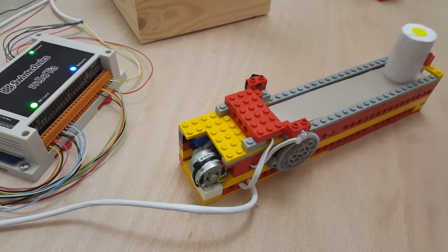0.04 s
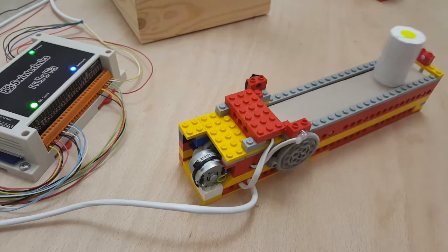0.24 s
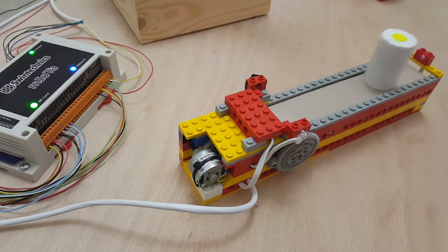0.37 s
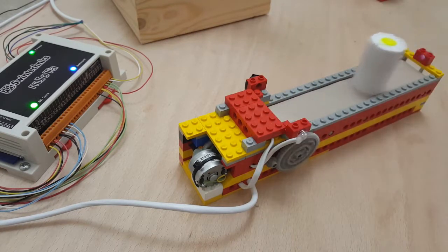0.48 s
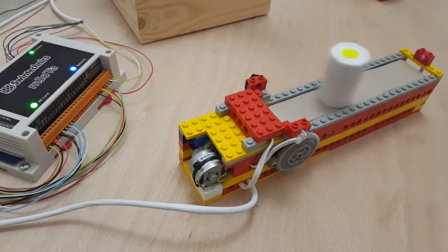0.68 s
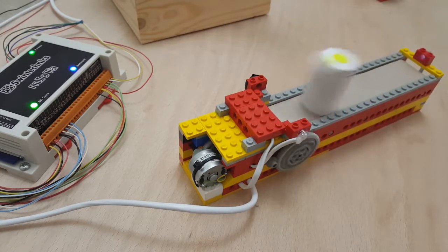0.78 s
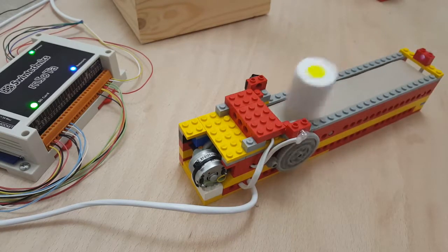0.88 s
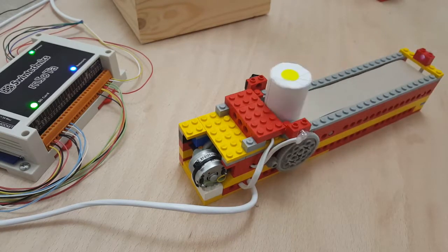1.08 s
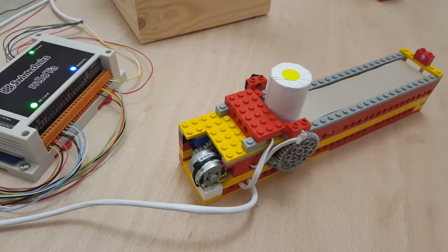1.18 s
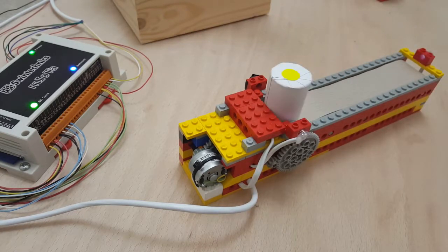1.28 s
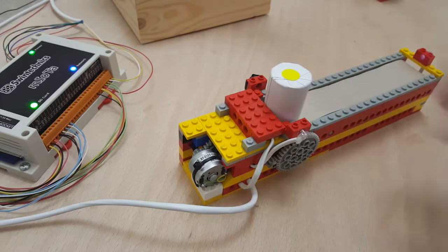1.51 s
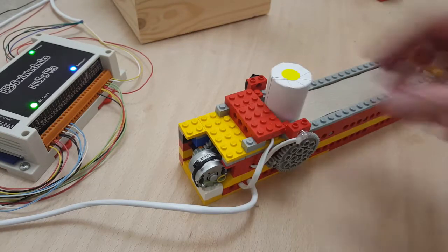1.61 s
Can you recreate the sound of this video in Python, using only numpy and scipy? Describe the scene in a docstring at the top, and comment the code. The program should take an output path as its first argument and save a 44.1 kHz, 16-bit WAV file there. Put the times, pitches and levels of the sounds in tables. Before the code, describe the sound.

Plastic gears grind and chatter as a motorized toy conveyor runs briefly and cuts out.

```python
"""A small DC motor drives a toy conveyor of plastic bricks on a table, close by in a small room.
From the start the motor hums, the gears grind and the table rumbles. As the load grows, teeth catch
and snap free about 19 times a second; each chatter rings the bricks and knocks the hollow base.
Cargo bumps from 0.2 s on; plastic squeaks once at 0.33 s. Near 1.17 s the cargo hits the end stop,
the motor cuts out and the room rings away. A faint rustle follows near 1.5 s."""
import sys
import numpy as np
from scipy import signal
from scipy.fft import rfft, irfft, next_fast_len
from scipy.io import wavfile
from scipy.ndimage import uniform_filter1d

SR = 44100
rng = np.random.default_rng(int(sys.argv[2]) if len(sys.argv) > 2 else 0)


def persist_wave(psi):
    """Save psi, clipped to +-1, as 16-bit WAV."""
    counts = np.round(np.clip(psi, -1, 1) * 32767).astype(np.int16)
    wavfile.write(sys.argv[1], SR, np.atleast_2d(counts).T)


N = 72765
T = np.arange(N) / SR
AGE = T[:SR // 2]  # time since a blow, s

# room air spectrum: freq_hz, gain_db
AIR_SPECTRUM = [(25, 1), (60, 0), (90, 4), (130, 0), (190, 1), (300, -4), (600, -8), (2000, -13),
                (6000, -27), (15000, -33)]
# motor hum partials: speed_multiple, level_db
HUM_PARTIALS = [(1, -58), (2, -62)]
# motor hum under load: time_s, gain_db
HUM_CURVE = [(0, -12), (.1, -7), (.3, -1.5), (.42, 6.5), (.58, -2.5), (.72, 4), (1.0, 1.5), (1.18, 6),
             (1.23, -9), (1.3, -41)]
# gear grinding: time_s, gain_db, treble_db
GRIND_CURVE = [(0, -27.5, -11), (.06, -25, -2), (.11, -18.5, -22), (.21, -14.5, -8.5), (.26, -7.5, -1),
               (.33, -14, -12), (.40, -8, -8), (.47, -9, -11.5), (.51, -1.5, 0.5), (.555, -4.5, -3),
               (.59, -3, 3), (.65, -2, -5.5), (.72, -3.5, 4), (.85, 4.5, -3.5), (.91, -2.5, 0),
               (1.02, -0.5, -4.5), (1.13, -3, 0), (1.17, -13, -4.5), (1.20, -26, -7.5), (1.27, -25, -3),
               (1.30, -56, 15.5)]
# plastic click spectrum: freq_hz, gain_db
CLICK_SPECTRUM = [(100, -20.5), (400, 2.5), (700, 1), (950, -6), (1250, 3), (1650, 1), (1930, 8.5),
                  (2200, 3.5), (2800, 1.5), (4400, 0.5), (5100, -8), (9500, -12.5), (13000, -14),
                  (15500, -28)]
# brick frame modes: freq_hz, t60_s, gain_db
FRAME_MODES = [(1189, 0.11, -2), (1502, 0.13, -8), (1974, 0.03, -5), (2400, .05, -6), (3612, .05, -3.5),
               (4270, 0.02, -10.5), (6395, 0.045, -7)]
# drive rumble into the table: time_s, gain_db
RUMBLE_CURVE = [(0, -16.5), (.08, -4.5), (.19, -6), (.25, -4.5), (.45, -1.5), (.65, 4), (.85, 2.5),
                (1.10, -0.5), (1.17, 7.5), (1.21, -21), (1.29, -39)]
# table and base modes: freq_hz, t60_s, gain_db
TABLE_BASE_MODES = [(92, 0.2, -9.5), (163.5, 0.11, -3), (196.3, 0.1, -3), (275.5, 0.053, -4),
                    (341, 0.05, -2), (381.5, 0.047, -0.5), (414.6, .07, -4.5), (595, 0.011, -13.5)]
# tooth snaps: start_s, chatter_db, length_s, treble_db, base_db, wheel_db, tooth_db
TOOTH_SNAPS = [(0.024, -28.5, 0.01, -6, -68, -70, -78), (0.077, -19.5, 0.0045, -7, -65, -60, -59),
               (0.084, -16.5, .012, -1.5, -53, -53, -63), (0.145, -20.5, 0.01, -4, -63, -66, -72),
               (0.228, -8, 0.011, 1, -36, -43, -48), (0.276, -18.5, 0.008, -14, -62, -58, -68),
               (0.362, -15, 0.0042, -9, -34.5, -58, -69), (0.407, -15.5, 0.021, -4, -46.5, -53, -70),
               (0.485, -6.5, 0.014, -0.5, -47.5, -50.5, -49.5), (0.563, -3.5, 0.011, 0, -44, -44, -38),
               (0.621, -2.5, 0.0052, .5, -45.5, -41, -45), (0.668, 3.5, 0.011, 1.5, -36.5, -29, -35),
               (0.719, 3.5, 0.0097, -0.5, -38.5, -39.5, -44.5),
               (0.734, -0.5, .0065, -4, -36.5, -37.5, -48.5), (0.769, 1.5, 0.0087, 2.5, -39, -32, -40.5),
               (0.817, -0.5, .0065, 2, -42, -27.5, -53.5), (0.865, -4, 0.0068, 3.5, -46.5, -40, -52.5),
               (0.918, -4.5, 0.01, 2.5, -40, -31.5, -54), (0.979, 0, 0.01, 1.5, -40, -47, -41.5),
               (1.038, -2, 0.0078, 1.5, -50, -37, -38.5), (1.087, -3, 0.0041, 2, -44, -42, -51.5),
               (1.139, -2, 0.011, -1, -39, -51, -42), (1.268, -35, 0.0034, -14.5, -61, -57, -78.5)]
# hollow base knock: pitch_hz, swell_s, gain_db
BASE_MODES = [(370.8, 0.0068, -1)]
# gear wheel ring: pitch_hz, swell_s, gain_db
WHEEL_MODES = [(1917, .0035, 0)]
# tooth ping: pitch_hz, swell_s, gain_db
TOOTH_MODES = [(4210, 0.0049, 4.5), (6300, 0.0021, -10)]
# cargo and frame bumps on the table: start_s, gain_db
CARGO_BUMPS = [(.195, -22), (.248, -10.5), (.495, -13), (.525, -18), (.848, 1.5), (1.050, -10),
               (1.153, -8.5), (1.165, -4.5)]
# soft bump spectrum: freq_hz, gain_db
BUMP_SPECTRUM = [(40, -32), (80, -8), (115, -12.5), (170, 2), (350, 1.5), (550, -8), (1200, -10.5),
                 (4000, -61)]
# deep sway of the table top: freq_hz, t60_s, gain_db
SWAY_MODES = [(82.7, .35, 4.5), (99, 0.39, -9)]
# rustle spectrum: freq_hz, gain_db
RUSTLE_SPECTRUM = [(400, -17.5), (950, -10), (1400, -0.5), (2050, -2.5), (2500, -6), (4500, -11),
                   (6000, -14.5), (12000, -16.5), (15500, -24)]
# room decay: freq_hz, t60_s
ROOM_DECAY = [(100, 0.4), (400, 0.35), (2000, 0.21), (5000, 0.23), (14000, .26)]
# room tail spectrum: freq_hz, gain_db
ROOM_SPECTRUM = [(100, -7.5), (400, -5.5), (2000, 1.5), (5000, 2), (14000, -1.5)]
# stereo balance: freq_hz, left_minus_right_db
BALANCE = [(170, -3.5), (380, 0.5), (2400, 0.5), (4400, -3.5), (8000, 4.5), (15000, 3)]

AIR_DB, AIR_LIKENESS, ROOM_HUM_HZ, ROOM_HUM_DB = -72.5, 0.37, 195.7, -79.5
MOTOR_HZ, MOTOR_WOW, HUM_FLUTTER_DB = 187.96, 0.05, 2.5
GRIND_DB, GRIND_FLUTTER_DB, MESH_DEPTH = -37, 2, 0.4
CLICKS_PER_S, CLICK_SPREAD_DB = 4500, 2.5
FRAME_RING_DB, TREBLE_HZ = 2, 4915
RUMBLE_DB, RUMBLE_HIGHPASS_HZ, BUMP_DB = -24.5, 141, 10
SNAP_DB, SNAP_CLICKS_PER_S, SNAP_DETUNE = 1.42, 2600, 0.018
CHATTER_ATTACK_S, CHATTER_RELEASE_S = 0.0041, 0.0013
SQUEAK_AT_S, SQUEAK_HALF_WIDTH_S, SQUEAK_HZ, SQUEAK_JITTER, SQUEAK_DB = 0.328, 0.009, 2010, 0.06, -44
RUSTLE_AT_S, RUSTLE_HALF_WIDTH_S, RUSTLE_DB = 1.485, 0.061, -69
SCATTER_T60_S, SCATTER_DB, SCATTER_HIGHPASS_HZ, RIGHT_LAG_S = 0.032, 5, 874, 0.00012
ROOM_GAP_S, ROOM_LIKENESS, WIDE_ABOVE_HZ = 0.0099, 0.62, 900


def undb(db):
    """Decibels to gain."""
    return 10 ** (np.asarray(db) / 20)


def unit(x):
    """Scale to rms 1."""
    return x / np.sqrt(np.mean(x ** 2))


def curve(table, col=1):
    """Table column, interpolated over time."""
    rows = np.array(table)
    return np.interp(T, rows[:, 0], rows[:, col])


def at_freq(table, f):
    """Table value, interpolated over log frequency."""
    rows = np.array(table)
    return np.interp(np.log(np.maximum(f, 1)), np.log(rows[:, 0]), rows[:, 1])


def shape(x, response):
    """Zero-phase filter with gain response(freq_hz)."""
    size = next_fast_len(x.shape[-1] + SR // 10, real=True)
    freq_hz = np.arange(size // 2 + 1) * SR / size
    return irfft(rfft(x, size) * response(freq_hz), size)[..., :x.shape[-1]]


def highpass(x, hz):
    """Second-order Butterworth high-pass."""
    return signal.sosfilt(signal.butter(2, hz, "high", fs=SR, output="sos"), x)


def through(x, response):
    """Convolve with a mono or stereo impulse response."""
    size = next_fast_len(N + len(AGE), real=True)
    return irfft(rfft(x, size) * rfft(response, size), size)[..., :N]


def tick(spectrum, size=4096):
    """Minimum-phase impulse with the given spectrum."""
    freq_hz = np.arange(size // 2 + 1) * SR / size
    cepstrum = irfft(np.log(undb(at_freq(spectrum, freq_hz))))
    cepstrum[1:size // 2] *= 2
    cepstrum[size // 2 + 1:] = 0
    return np.pad(irfft(np.exp(rfft(cepstrum))), (0, len(AGE) - size))


def ring(modes):
    """Impulse response of damped modes, alternating in sign; gain_db holds at resonance."""
    out = 0
    for k, (hz, t60_s, gain_db) in enumerate(modes):
        decay = np.log(1000) / t60_s
        gain = (-1) ** k * undb(gain_db) * 2 * decay / SR
        out = out + gain * np.exp(-decay * AGE) * np.sin(2 * np.pi * hz * AGE)
    return out


def fade(t60_s, gap_s):
    """Unit-energy decay starting after a gap."""
    decay = np.log(1000) / t60_s
    return (AGE >= gap_s) * np.exp(-decay * np.maximum(AGE - gap_s, 0)) * np.sqrt(2 * decay / SR)


def wander(rate_hz):
    """Smooth random drift, rms 1."""
    hold = int(SR / rate_hz)
    steps = np.repeat(rng.standard_normal(N // hold + 1), hold)
    return unit(uniform_filter1d(steps, hold)[:N])


def clicks(per_s):
    """Dense tiny impacts of uneven size, rms 1."""
    hits = (rng.random(N) < per_s / SR) * rng.choice([-1, 1], N)
    return unit(hits * undb(CLICK_SPREAD_DB * np.clip(rng.standard_normal(N), -2, 2)))


def stereo_noise(likeness):
    """Noise at two microphones: partly alike in the bass, unrelated in the treble."""
    mid, side = rng.standard_normal((2, N))
    coherence = lambda f: likeness / (1 + (f / WIDE_ABOVE_HZ) ** 2)
    mid = shape(mid, lambda f: np.sqrt(1 + coherence(f)))
    side = shape(side, lambda f: np.sqrt(1 - coherence(f)))
    return np.array([mid + side, mid - side]) / np.sqrt(2)


def room_air():
    """Quiet air with a faint steady hum."""
    air = unit(shape(stereo_noise(AIR_LIKENESS), lambda f: undb(at_freq(AIR_SPECTRUM, f))))
    hum = np.sqrt(2) * np.sin(2 * np.pi * ROOM_HUM_HZ * T)
    return undb(AIR_DB) * air + undb(ROOM_HUM_DB) * hum


def motor_hum(turns):
    """Rotor imbalance hums unevenly through the base."""
    load_db = curve(HUM_CURVE)
    return sum(undb(db + load_db + HUM_FLUTTER_DB * wander(45)) * np.sin(2 * np.pi * multiple * turns)
               for multiple, db in HUM_PARTIALS)


def gear_grind(turns):
    """Teeth scrape, swelling once per motor turn. Rows: force, treble change."""
    mesh = 1 + MESH_DEPTH * np.cos(2 * np.pi * turns)
    scrape = clicks(CLICKS_PER_S) * mesh
    force = scrape * undb(GRIND_DB + curve(GRIND_CURVE) + GRIND_FLUTTER_DB * wander(120))
    return np.array([force, force * (undb(curve(GRIND_CURVE, col=2)) - 1)])


def brick_frame(force, treble_change, places=4):
    """Each impact rings the frame at a random place. One signal per place."""
    place = rng.integers(0, places, N)
    response = tick(CLICK_SPECTRUM) + undb(FRAME_RING_DB) * ring(FRAME_MODES)
    parts = []
    for k in range(places):
        treble = shape(treble_change * (place == k), lambda f: f ** 6 / (f ** 6 + TREBLE_HZ ** 6))
        parts.append(through(force * (place == k) + treble, response))
    return parts


def table_rumble():
    """Grinding lightly shakes table and base."""
    shake = clicks(CLICKS_PER_S) * undb(RUMBLE_DB + curve(RUMBLE_CURVE))
    return through(highpass(shake, RUMBLE_HIGHPASS_HZ), ring(TABLE_BASE_MODES))


def snap_chatter():
    """Each slipping tooth chatters briefly. Rows: force, treble change."""
    grain = clicks(SNAP_CLICKS_PER_S)
    out = np.zeros((2, N))
    for start_s, chatter_db, length_s, treble_db, *_ in TOOTH_SNAPS:
        first = int(start_s * SR)
        span = slice(first, first + SR // 20)
        age_s = T[span] - T[first]
        attack = np.minimum(age_s / CHATTER_ATTACK_S, 1)
        release = np.exp(-np.maximum(age_s - length_s, 0) / CHATTER_RELEASE_S)
        burst = grain[span] * attack * release
        burst *= undb(SNAP_DB + chatter_db) / np.linalg.norm(burst)
        out[:, span] += np.outer([1, undb(treble_db) - 1], burst)
    return out


def snap_rings():
    """Base, wheel and tooth swell and die with each snap, slightly detuned every time."""
    out = np.zeros(N + len(AGE))
    for start_s, _, _, _, *levels_db in TOOTH_SNAPS:
        first = int(start_s * SR)
        for modes, level_db in zip((BASE_MODES, WHEEL_MODES, TOOTH_MODES), levels_db):
            for pitch_hz, swell_s, gain_db in modes:
                detuned_hz = pitch_hz * (1 + SNAP_DETUNE * rng.standard_normal())
                envelope = undb(level_db + gain_db) * AGE / swell_s * np.exp(1 - AGE / swell_s)
                out[first:first + len(AGE)] += envelope * np.sin(2 * np.pi * detuned_hz * AGE)
    return out[:N]


def cargo_bumps():
    """Soft blows of cargo and frame ring the table down to its deepest modes."""
    blows = np.zeros(N)
    for start_s, gain_db in CARGO_BUMPS:
        blows[int(start_s * SR)] += undb(BUMP_DB + gain_db)
    return through(blows, tick(BUMP_SPECTRUM) + ring(TABLE_BASE_MODES) + ring(SWAY_MODES))


def squeak():
    """Rubbing plastic gives one tiny rough squeak."""
    pitch_hz = SQUEAK_HZ * (1 + SQUEAK_JITTER * wander(600))
    envelope = np.exp(-((T - SQUEAK_AT_S) / SQUEAK_HALF_WIDTH_S) ** 2)
    return undb(SQUEAK_DB) * envelope * np.sin(2 * np.pi * np.cumsum(pitch_hz) / SR)


def rustle():
    """Something brushes softly nearby after the stop."""
    rub = unit(shape(stereo_noise(AIR_LIKENESS), lambda f: undb(at_freq(RUSTLE_SPECTRUM, f))))
    envelope = np.exp(-((T - RUSTLE_AT_S) / RUSTLE_HALF_WIDTH_S) ** 2)
    return undb(RUSTLE_DB) * envelope * rub


def near_paths(x):
    """Direct sound at both microphones plus quick scatter off bricks and table top."""
    scatter = rng.standard_normal((2, len(AGE))) * fade(SCATTER_T60_S, gap_s=0)
    paths = undb(SCATTER_DB) * highpass(scatter, SCATTER_HIGHPASS_HZ)
    paths[0, 0] += 1
    paths[1, int(RIGHT_LAG_S * SR)] += 1
    return through(x, paths)


def room_tail(x):
    """Diffuse reverberation, longest in the bass."""
    noise = stereo_noise(ROOM_LIKENESS)[:, :len(AGE)]
    centres_hz = [hz for hz, _ in ROOM_DECAY]
    tail = 0
    for (_, t60_s), weights in zip(ROOM_DECAY, np.eye(len(centres_hz))):
        crossover = list(zip(centres_hz, weights))
        band = shape(noise, lambda f: at_freq(crossover, f) * undb(at_freq(ROOM_SPECTRUM, f)))
        tail = tail + fade(t60_s, ROOM_GAP_S) * band
    return through(x, tail)


def scene():
    """Conveyor in its room; each part reaches the microphones by its own paths."""
    turns = np.cumsum(MOTOR_HZ * (1 + MOTOR_WOW * wander(24.95))) / SR
    force, treble_change = snap_chatter() + gear_grind(turns)
    parts = brick_frame(force, treble_change)
    parts.append(snap_rings())
    parts.append(table_rumble() + motor_hum(turns) + cargo_bumps() + squeak())
    heard = sum(near_paths(part) for part in parts) + room_tail(sum(parts))
    balanced = shape(heard, lambda f: undb(np.outer([1, -1], at_freq(BALANCE, f)) / 2))
    return balanced + rustle() + room_air()


def record(dry):
    """Steep low-pass at 15.8 kHz."""
    return signal.sosfilt(signal.ellip(10, 0.2, 70, 15800, fs=SR, output="sos"), dry)


dry = scene()
out = record(dry)
persist_wave(out)
```